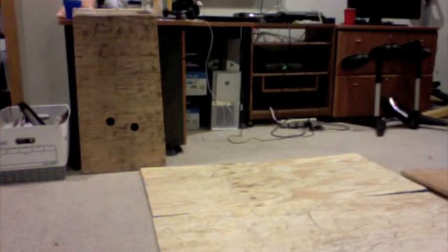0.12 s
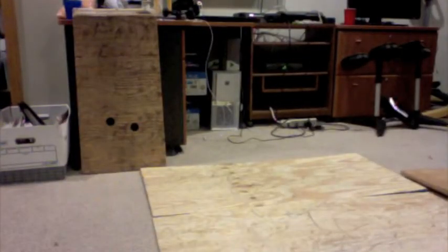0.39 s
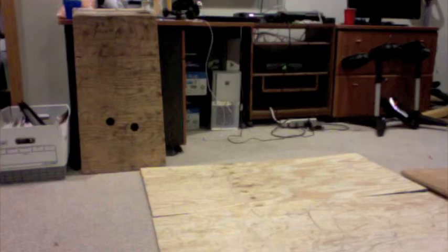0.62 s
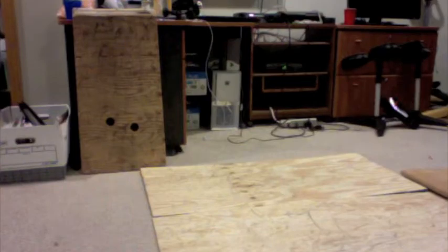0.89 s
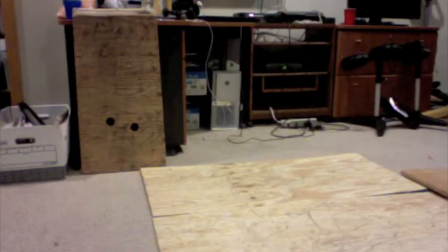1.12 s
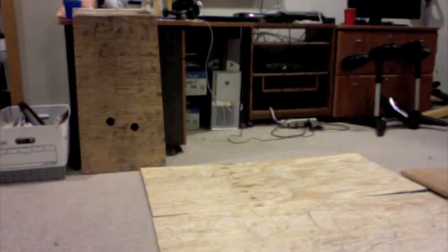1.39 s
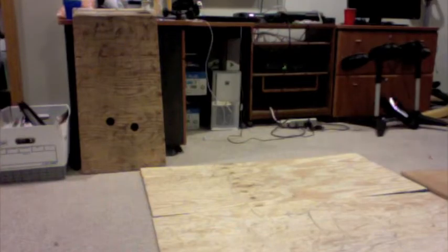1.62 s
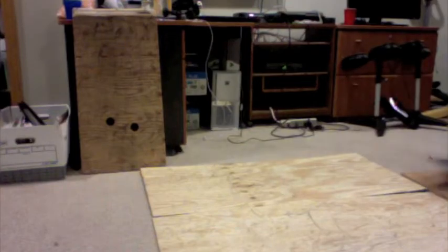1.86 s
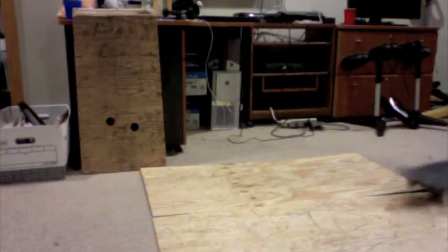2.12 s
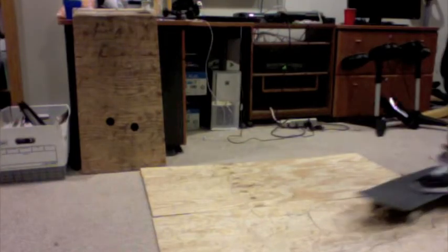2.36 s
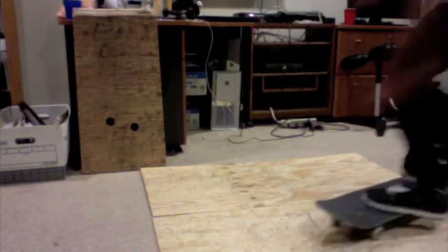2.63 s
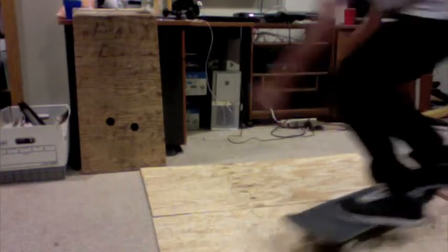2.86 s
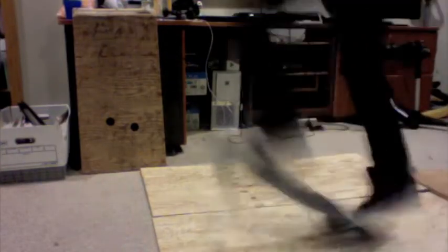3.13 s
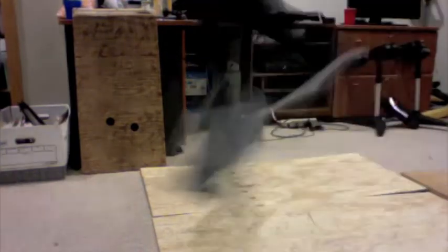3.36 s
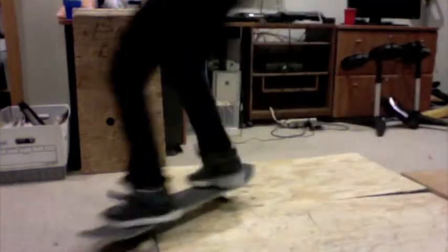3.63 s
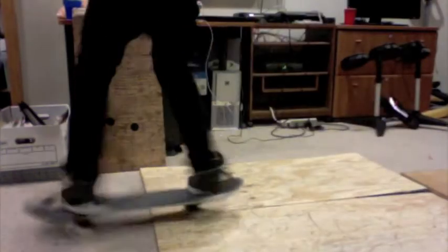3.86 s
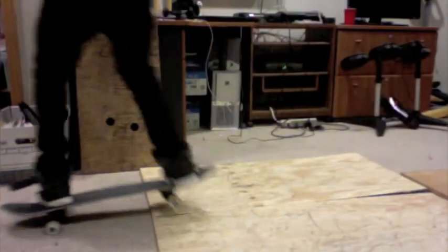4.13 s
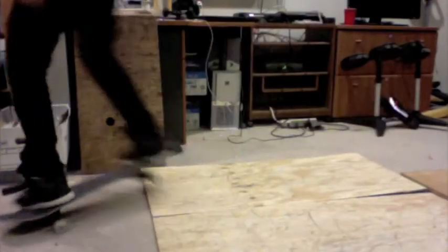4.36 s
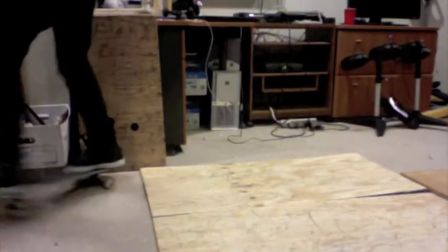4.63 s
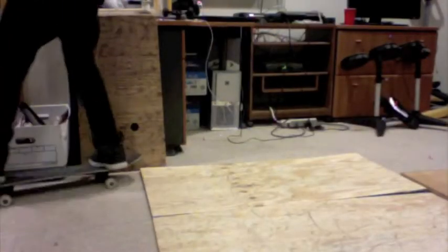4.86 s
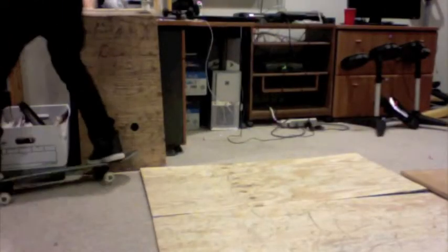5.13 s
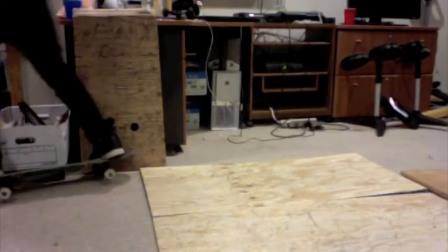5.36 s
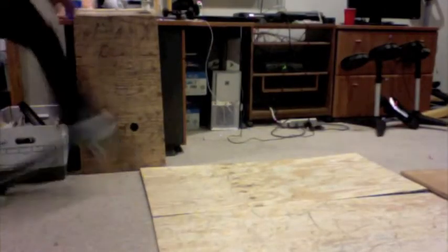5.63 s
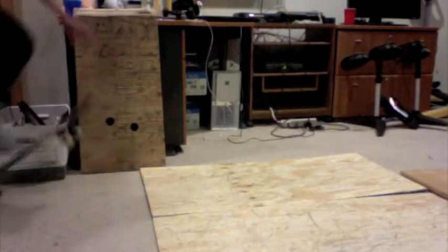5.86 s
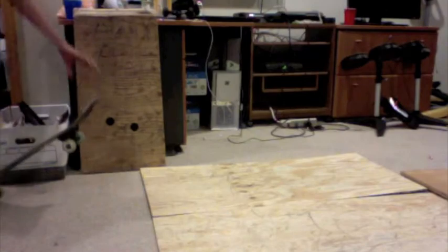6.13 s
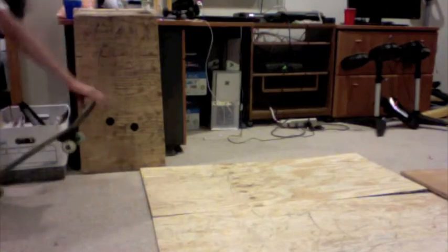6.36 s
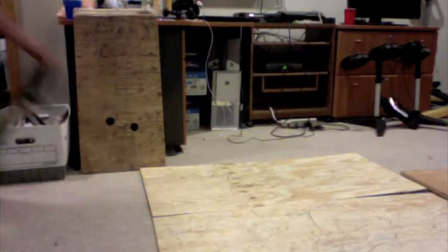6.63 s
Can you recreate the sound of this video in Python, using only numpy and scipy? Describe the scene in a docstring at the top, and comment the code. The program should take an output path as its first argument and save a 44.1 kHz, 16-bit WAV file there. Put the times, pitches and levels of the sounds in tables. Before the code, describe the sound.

Hard woody knocks, a short hollow roll across plywood, a sharp skateboard flip and landing, a brief squeak, then lighter carpet thuds and scrapes.

```python
"""Skateboard on plywood sheets

A skateboard in a small carpeted room rolls over loose plywood sheets, drops off their edges, is popped,
flipped and landed, then rolls onto the carpet and is kicked up. Blows, rolling and rubbing are noise
forces and sharp pushes that ring the resonances of the hollow sheet, deck, metal trucks and axles.
Squeaks and room hush are filtered noise. A small built-in microphone colours the sound and limits it hard.
"""
import sys
import numpy as np
from scipy import signal
from scipy.fft import rfft, irfft, next_fast_len
from scipy.io import wavfile
from scipy.ndimage import uniform_filter1d, minimum_filter1d, map_coordinates

SR = 44100
rng = np.random.default_rng(int(sys.argv[2]) if len(sys.argv) > 2 else 0)


def inscribe(sig):
    """Save sig as 16-bit PCM at rate SR to the path in sys.argv[1].

    A 1-D sig is mono; a 2-D sig holds one channel per row.
    Samples are clipped to [-1, 1] before scaling.
    """
    pcm = np.round(np.clip(np.atleast_2d(sig).T, -1, 1) * 32767)
    wavfile.write(sys.argv[1], SR, pcm.astype(np.int16))


def attenuation_scalar(level_db):
    """Turn a level in dB into a linear amplitude multiplier (20 dB per decade)."""
    decades = np.asarray(level_db, float) / 20
    return 10 ** decades


N = 297498


def unit(x):
    """Scale to rms 1."""
    return x / np.sqrt(np.mean(x ** 2) + 1e-20)


def wobble(knots_per_s):
    """A smooth random curve through normally distributed knots."""
    knots = rng.standard_normal(int(N * knots_per_s / SR) + 4)
    return map_coordinates(knots, [np.arange(N) * knots_per_s / SR])


def filtered(x, response):
    """x times a complex response of frequency."""
    m = next_fast_len(N + SR // 2)
    return irfft(rfft(x, m) * response(np.fft.rfftfreq(m, 1 / SR)), m)[:N]


def peak(f, hz, width_hz):
    """One causal resonance, gain 1 at its centre."""
    return 1j * f * width_hz / (hz * hz - f * f + 1j * f * width_hz)


# room spectrum shape: (frequency [Hz], relative density [dB])
HUSH_SPECTRUM = [(35, -22.5), (60, -16), (114, -1), (422, -5), (472, -6), (1400, -9), (1630, -6),
                 (12000, -29), (15600, -62.5), (22000, -120)]


def hush():
    """The quiet of the room: shaped noise with a slowly wavering level."""
    hz, db = np.transpose(HUSH_SPECTRUM)
    noise = filtered(rng.standard_normal(N), lambda f: attenuation_scalar(np.interp(np.log(f + 1), np.log(hz), db)))
    level_db = -63 + 1.2 * wobble(9.4)
    return attenuation_scalar(level_db) * unit(noise)


# rubbery squeaks, thin whirrs, low floor groans:
# (start [s], pitch [Hz], width [Hz], relative level [dB], time scale [s])
SQUEAKS = [(1.324, 95, 52, -49, 0.54), (1.649, 101, 23, -50, 0.27), (3.867, 4160, 1800, -37, 0.15),
           (3.832, 1476, 240, -36, 0.18), (3.887, 1590, 110, -41, 0.12), (3.997, 1500, 44, -58, 0.32),
           (5.198, 1490, 29, -65, 0.16), (5.322, 2440, 190, -39, 0.038), (5.351, 2220, 530, -39.5, 0.091),
           (5.355, 2950, 240, -38, 0.058), (5.772, 95, 10, -41.5, 0.1)]


def squeaks():
    """Narrow noise swelling and fading around one pitch."""
    out, t = np.zeros(N), np.arange(N) / SR
    for start_s, hz, width_hz, db, scale_s in SQUEAKS:
        u = np.maximum(t - start_s, 0) / scale_s
        swell = 3 * u * np.exp(-3 * u * u)
        tone = unit(filtered(rng.standard_normal(N), lambda f: peak(f, hz, width_hz) ** 2))
        out += attenuation_scalar(db) * tone * swell
    return out


# shoes rubbing the grip, wheels dragging on carpet:
# (start [s], length [s], deck drive [dB], hiss re deck [dB])
RUBS = [(0.168, 0.22, -40.5, -12), (1.4, 0.47, -42, 0), (1.751, 0.13, -35.5, -3.5),
        (1.856, 0.14, -36.5, -5.5), (2.469, .18, -33.5, 2), (2.862, 0.19, -38, 6),
        (3.556, 0.2, -28.5, -3.5), (3.793, 0.25, -37.5, -17), (3.925, 0.41, -52, -10),
        (4.386, .4, -36, -12), (5.101, 0.12, -59.5, 8), (5.397, 0.49, -38.5, -13),
        (5.721, 0.18, -34.5, -25), (5.837, 0.22, -54.5, -13.5)]


def rubs(hiss):
    """Strength of the rubbing at each sample, in the deck or as hiss: swell, hold, fade."""
    edge_share = 0.28  # of a rub, spent swelling and again fading
    out, t = np.zeros(N), np.arange(N) / SR
    for start_s, length_s, deck_db, hiss_db in RUBS:
        u = (t - start_s) / length_s
        envelope = np.clip(np.minimum(u, 1 - u) / edge_share, 0, 1) ** 2
        out += attenuation_scalar(deck_db + hiss * hiss_db) * envelope
    return out


# weight on the wheels rolling over the sheet: (time [s], rumble drive [dB])
WHEELS = [(0, -38.5), (.16, -46), (.3, -53.5), (.36, -80), (1.36, -82.5), (1.461, -35.5), (1.67, -29),
          (1.8, -24.5), (1.919, -24.5), (2.05, -29.5), (2.44, -24.5), (2.62, -32), (2.701, -37.5),
          (2.87, -28.5), (2.94, -22), (3.06, -37), (3.15, -75.5), (3.45, -71.5), (3.52, -31.5), (3.81, -36),
          (3.92, -73.5), (6.75, -84)]


def wheels():
    """Strength of the rolling at each sample, interpolated in dB."""
    time_s, db = np.transpose(WHEELS)
    return attenuation_scalar(np.interp(np.arange(N) / SR, time_s, db))


def rough(strength, grain_db, knots_per_s):
    """Force of wheels and soles crossing a rough surface: noise in uneven bumps."""
    bumps = attenuation_scalar(grain_db * wobble(knots_per_s) + 1.3 * wobble(22))
    return strength * unit(bumps * rng.standard_normal(N))


def metal_hiss():
    """Strength of bearing and rubbing hiss in trucks and axles."""
    bearing_db = -36  # re rumble
    return attenuation_scalar(bearing_db) * wheels() + rubs(hiss=True)


# hard contacts of wheels, tail and nose:
# (time [s], relative deck level [dB], sheet re deck [dB], trucks re deck [dB], clatter [ms])
KNOCKS = [(.354, -0.5, -5.5, -16, 110), (0.4577, 9.5, -8.5, -16.5, 50), (.716, -4, -6.5, -16, 14),
          (1.022, -44.5, -15, -16, 27), (1.317, -17, -1, -18.5, 13), (1.38, -16.5, 2, -19, 16),
          (2.063, -9.5, -3, -13.5, 9), (2.189, -14.5, -2, -11, 9.5), (2.466, -4.5, 0.5, -16, 58),
          (3.089, -0.5, -12, -7.5, 24), (3.355, 5.5, 2.5, -8, 35), (3.68, -7.5, -1, -15, 15),
          (4.393, -18.5, -19, -20, 54), (4.824, -11, -1.5, -12, 78), (5.099, -34.5, -15, -13, 8.8),
          (5.292, -64.5, 24.5, -17, 6.1), (5.412, -23.5, -11, -43, 16), (5.49, -20, -12, -21.5, 16),
          (5.522, -26, -9, 1.5, 25), (5.6, -13, 0.5, -15.5, 13), (6.007, -30, -21, -24, 6.9),
          (6.098, -62, 13.5, 3, 16), (6.372, -24, -6.5, -20.5, 18), (6.664, -44.5, -8.5, -21, 18)]
# soft contacts of shoes and hands:
# (time [s], relative deck level [dB], sheet re deck [dB], trucks re deck [dB], clatter [ms])
SHOVES = [(1.113, -41.5, -0.5, -14, 19), (1.19, -47, -16, -14.5, 33), (2.362, -28, -19, -11, 20),
          (2.872, -39, 15, -6, 15), (2.935, -18, 6, -9.5, 24), (3.039, -26.5, 16, -11.5, 21),
          (3.296, -6, -11.5, -16, 70), (3.397, 3, 0.5, -12, 60), (3.435, -6, -3.5, -10, 40),
          (3.632, -8, -12.5, -12.5, 20), (3.786, -14, -8.5, -28, 6), (4.378, -20.5, -15, -7.5, 14),
          (4.516, -20, -14, -8.5, 31), (4.615, -28, -9, -16, 15), (4.693, -20, -12, -13, 12),
          (5.356, -38, -28, 8, 53), (5.722, -20, -4.5, -14, 15), (5.945, -38.5, -9, -35, 11),
          (6.319, -47, -7, 11.5, 3)]


def blows(column, t60_s, snap):
    """Force on one body: a sharp push and three bounces, a clatter, then the dense echoes of the room."""
    knock_rise_ms, shove_rise_ms = 2.2, 9
    shape, push, t = np.zeros(N + SR), np.zeros(N + SR), np.arange(SR // 2) / SR
    hits = [(*row, knock_rise_ms) for row in KNOCKS] + [(*row, shove_rise_ms) for row in SHOVES]
    for row, luck in zip(hits, rng.random((len(hits), 3))):
        start_s, deck_db = row[:2]
        clatter_s, rise_s = np.array(row[4:]) / 1000
        start = round(start_s * SR)
        re_deck_db = row[column] if column > 1 else 0
        size = attenuation_scalar(deck_db + re_deck_db - 5.5)
        late_s = np.hypot(t, clatter_s) - clatter_s  # decay sets in after the clatter
        onset = (1 - np.exp(-t / rise_s)) ** 1.1
        shape[start:][:len(t)] += size * onset * attenuation_scalar(-60 * late_s / t60_s)
        push[start] = size * snap * np.exp(-rise_s / 0.0049)  # abrupt contacts push hardest
        bounces_s = start_s + rise_s + 0.6 * clatter_s * luck
        push[np.round(bounces_s * SR).astype(int)] += 0.2 * size * snap
    rattle = attenuation_scalar(1.1 * wobble(170))  # wall echoes make the tail lumpy
    return push[:N] + shape[:N] * unit(rattle * rng.standard_normal(N))


# where the weight rests: (from [s], favoured sheet pitch [Hz], favoured deck pitch [Hz])
STANCE = [(0, 414, 893), (.35, 254, 1802), (.45, 365, 850), (.709, 355.3, 1390), (1.02, 380, 920),
          (1.31, 326, 1051), (1.378, 218, 1090), (1.45, 330, 620), (1.719, 216, 696), (1.84, 322, 790),
          (2.053, 333, 1570), (2.182, 277, 899), (2.46, 217, 770), (2.7, 255, 625), (3.089, 370, 1807),
          (3.353, 263, 600), (3.438, 271, 2422), (3.63, 243.5, 1217), (3.868, 260, 1517), (4.37, 335, 1545),
          (4.82, 372, 864), (5.094, 354, 605), (5.411, 358, 1481), (5.719, 397, 730), (6.0, 357, 1870),
          (6.09, 341, 655), (6.37, 200.7, 850)]


def favoured(column):
    """The favoured pitch at each sample, held until the stance changes."""
    rows = np.transpose(STANCE)
    return rows[column][np.searchsorted(rows[0][1:], np.arange(N) / SR)]


def body(force, modes, favoured_hz=None, spread=0.3, lift_db=0):
    """A force through a body's resonances; those near the favoured pitch are driven harder."""
    gains = []
    for hz, _, _ in modes:
        if favoured_hz is None:
            gains.append(1)
        else:
            nearness = np.exp(-(np.log(favoured_hz / hz) / spread) ** 2)
            gains.append(attenuation_scalar(lift_db * nearness))
    power = sum(g * g * attenuation_scalar(2 * db) * np.pi * width_hz / SR for g, (_, width_hz, db) in zip(gains, modes))
    force = force / np.sqrt(power)  # white noise roughly keeps its rms
    out = np.zeros(N)
    for k, (gain, (hz, width_hz, db)) in enumerate(zip(gains, modes)):
        ring = filtered(gain * force, lambda f: peak(f, hz, width_hz))
        out += (-1) ** k * attenuation_scalar(db) * ring  # alternate polarity
    return out


# axle resonances: (frequency [Hz], width [Hz], relative level [dB])
AXLES = [(8280, 3900, -1), (9850, 4100, -1.5), (12600, 3100, -16)]


def axles():
    """Highest metal ring, from blows and hiss."""
    force = blows(column=3, t60_s=0.29, snap=24)
    force = force + attenuation_scalar(-3) * rough(metal_hiss(), grain_db=3.0, knots_per_s=750)
    return attenuation_scalar(-1) * body(force, AXLES)


# truck resonances: (frequency [Hz], width [Hz], relative level [dB])
TRUCKS = [(3940, 1780, -0.95), (5510, 1700, -0.46)]


def trucks():
    """Broad metal ring, from blows and hiss."""
    force = blows(column=3, t60_s=0.3, snap=16) + rough(metal_hiss(), grain_db=1.0, knots_per_s=760)
    return body(force, TRUCKS)


# hollow sheet resonances: (frequency [Hz], width [Hz], relative level [dB])
SHEET = [(95, 10, -18), (127, 76, -11.5), (194.5, 43, 0.5), (226, 25, -3.5), (268.7, 12, 0.5),
         (296.1, 27, -3), (335, 37, -0.5), (383.8, 23, 0), (412.4, 67, -3.5)]


def sheet():
    """Low boom of the hollow sheet under blows and rolling wheels."""
    tyre_hz = 600  # soft wheels pass little above this
    rumble = rough(wheels(), grain_db=0.5, knots_per_s=37)
    rumble = filtered(rumble, lambda f: 1 / (1 + 1j * f / tyre_hz) ** 2)
    force = blows(column=2, t60_s=0.25, snap=44) + rumble
    return body(force, SHEET, favoured(column=1), spread=0.11, lift_db=7.5)


# deck resonances: (frequency [Hz], width [Hz], relative level [dB])
DECK = [(615.3, 92, 9), (726, 20, -11), (724.4, 120, 11), (850, 9.5, 4.5), (876.4, 9, 4), (1083, 410, 10),
        (1324, 165, 14.5), (1400, 167, 13), (1740, 467, 9.5), (1970, 309, 11), (2325, 553, 2),
        (2830, 200, -20.5)]


def deck():
    """Woody ring of the deck under blows, rolling drone and rubbing."""
    drone_db = -17.5  # re rumble
    strength = attenuation_scalar(drone_db) * wheels() + rubs(hiss=False)
    force = blows(column=1, t60_s=0.28, snap=6.5) + rough(strength, grain_db=1.5, knots_per_s=250)
    return body(force, DECK, favoured(column=2), spread=0.13, lift_db=4.5)


def scene():
    """Room hush and squeaks under the four ringing bodies."""
    return (hush() + squeaks() + axles() + trucks() + sheet() + deck())[None]


# dips of the microphone housing: (frequency [Hz], width [Hz], depth [0-1])
DIPS = [(4840, 1200, .85), (7210, 310, 0.4), (9030, 400, 0.7), (10900, 170, 1), (13500, 500, .6)]


def housing(f):
    """Response of the microphone housing: bass cut and narrow dips."""
    h = (1j * f / (55 + 1j * f)) ** 2 * 1j * f / (45 + 1j * f)
    for hz, width_hz, depth in DIPS:
        h = h * (1 - depth * peak(f, hz, width_hz))
    return h


def expander(x, knee_db, slope):
    """Gain control that turns faint sound further down (slope in dB per dB), so tails end early."""
    level_db = 10 * np.log10(abs(uniform_filter1d(x * x, size=1024)) + 1e-12)
    return x * attenuation_scalar(slope * np.minimum(level_db - knee_db, 0))


def limiter(x, top):
    """A very fast limiter: gain dips for under a millisecond around each sample above the top."""
    need = np.minimum(1, top / (abs(x) + 1e-9))
    return x * uniform_filter1d(minimum_filter1d(need, size=27), size=27)


def roll_off(x):
    """The treble ends steeply here."""
    return signal.sosfilt(signal.butter(12, 15900, fs=SR, output="sos"), x)


def record(dry):
    """Housing colour; faint sound is turned down, loud sound limited, then a band limit."""
    treble_hz = 8090  # faint sound above this is cut harder
    x = expander(filtered(dry[0], housing), knee_db=-34.0, slope=0.08)
    treble = filtered(x, lambda f: 1 / (1 + (treble_hz / (f + 1)) ** 6))
    x = x - treble + expander(treble, knee_db=-59, slope=0.54)
    x = limiter(x, top=0.97)
    x = filtered(x, lambda f: (1j * f / (60 + 1j * f)) ** 2 / (1 + (f / 15600) ** 40))
    mix = np.clip(x, -1, 1)[None]
    return roll_off(mix)


dry = scene()
out = record(dry)
inscribe(out)
```